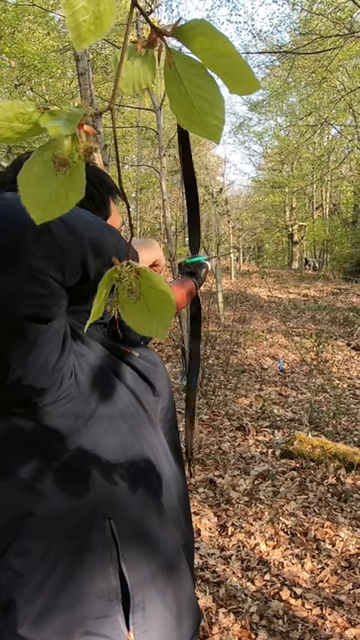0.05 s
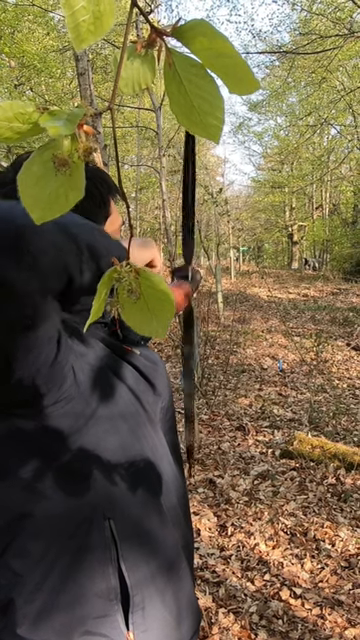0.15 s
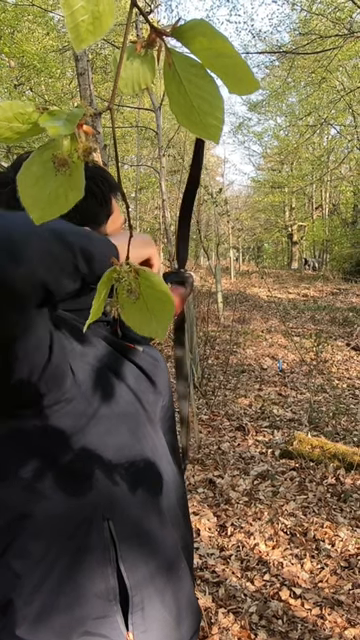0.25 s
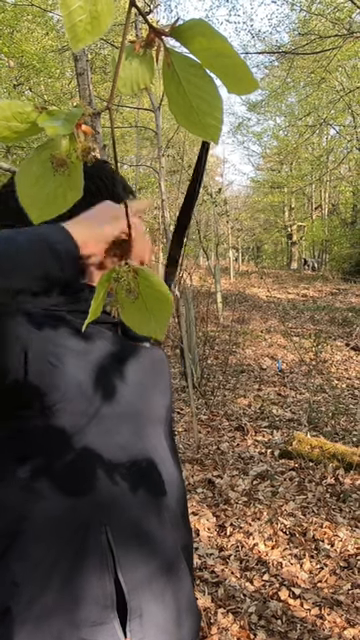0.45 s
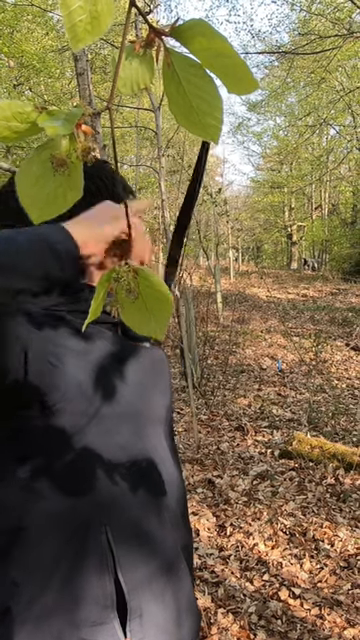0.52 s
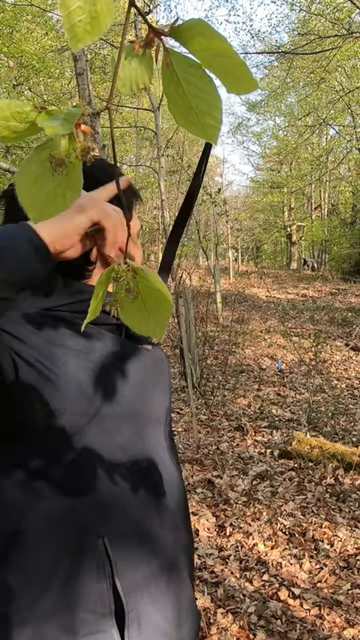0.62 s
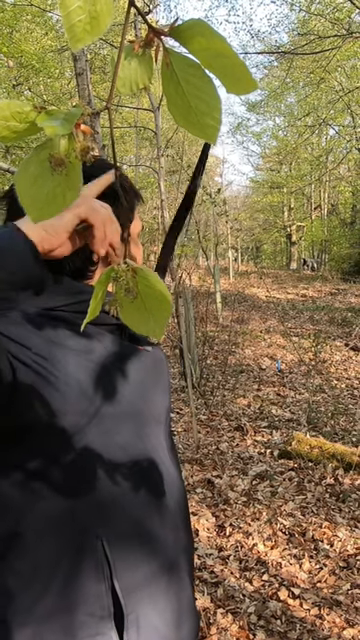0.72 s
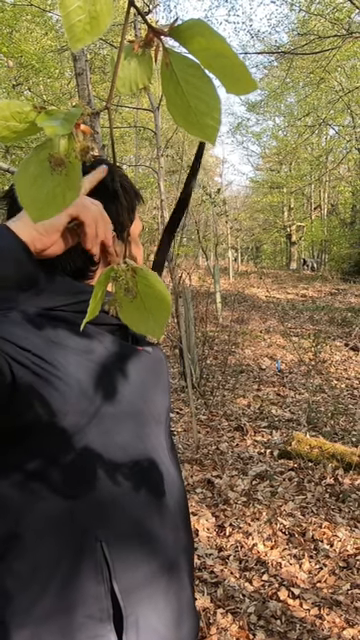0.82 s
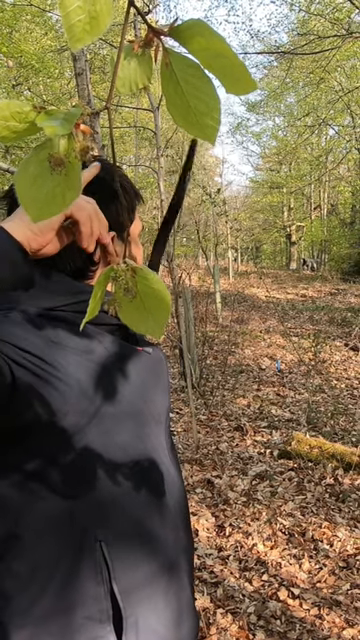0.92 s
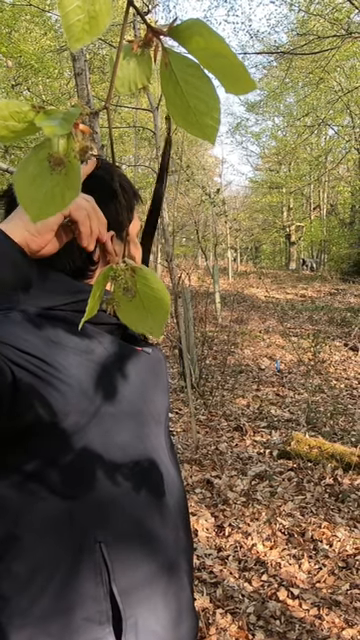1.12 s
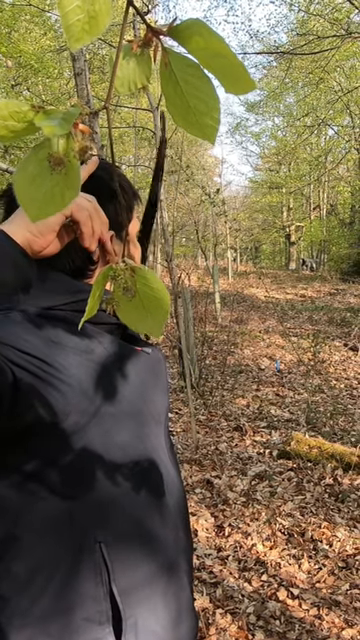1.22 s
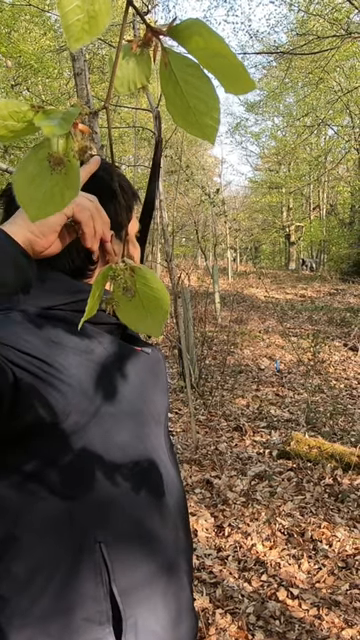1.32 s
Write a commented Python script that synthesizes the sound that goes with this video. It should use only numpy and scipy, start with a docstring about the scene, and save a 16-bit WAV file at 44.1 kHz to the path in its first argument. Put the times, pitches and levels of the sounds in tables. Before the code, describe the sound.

A bow fires an arrow with a dull thump and clack, echoing through quiet woods.

```python
"""A bow is shot in a quiet wood, heard from just behind the archer; the whole sound is deep and dull.
First the string scrapes off the fingers and the bow's limbs (its bendy arms) lurch forward.
The arrow clacks along the bow, the string slaps home, and limbs and string swing on.
Then tree trunks scatter the shot into a long tail, in which one faint far knock is heard.
A thin hiss rides on the shot, and moving air rumbles softly from start to end."""
import sys
import numpy as np
from scipy import signal
from scipy.fft import rfft, irfft
from scipy.io import wavfile
from scipy.ndimage import uniform_filter1d

SR = 44100
rng = np.random.default_rng(int(sys.argv[2]) if len(sys.argv) > 2 else 0)


def bounce(signal):
    """Save signal as a 16-bit WAV file at the path given by the first command-line argument."""
    frames = np.transpose(np.atleast_2d(signal))
    limited = np.clip(frames, -1, 1)
    pcm = np.round(limited * 32767).astype(np.int16)
    wavfile.write(sys.argv[1], SR, pcm)


N = 59535

# Hits on the bow: start_s, thump_db, knock_db, clack_db, contact_s
BOW_HITS = [(0.2007, -38, -34, -31, 0.0009), (0.208, -21, -22, -30, 0.004), (0.2222, -9, -17, -34, 0.003),
            (0.2298, -12, -15, -27, 0.003), (0.2598, -21, -22, -39, 0.0013), (0.2748, -18, -13, -17, 0.002),
            (0.2775, -20, -18, -13, 0.0005), (0.2835, -22, -14, -28, 0.002), (0.2921, -15, -8, -9, 0.0025),
            (0.3009, -32, -2, -24, 0.002), (0.307, -16, -12, -16, 0.002), (0.3098, -15, -34, -20, 0.0005),
            (0.326, -23, -18, -29, 0.0005), (0.3439, -20, -22, -25, 0.0015),
            (0.3584, -20, -12, -30, 0.0038)]
# The grip's low (thump), middle (knock) and high (clack) tones; the middle tones together make one broad, short
# ring near 850 Hz: pitch_hz, level_db, ring_s
THUMP_TONES = [(188, -1, .06), (210, -5, .07), (265, -10, .05), (350, -3, .04), (435, -6, .045)]
KNOCK_TONES = [(685, -8, .04), (805, -4, .035), (935, -3, .035), (1010, -12, .025)]
CLACK_TONES = [(1340, -8, .03), (1440, -5, .03), (1530, -5, .035), (2000, -18, .035)]


def bow_hits():
    """Each hit from the arrow or string makes the bow's grip ring and gives a short, noisy crack."""
    trim_db, crack_db, crack_fade_s = -0.5, -15.5, 0.012
    ringing, cracks = np.zeros((2, N)), np.zeros(N)
    for start_s, thump_db, knock_db, clack_db, contact_s in BOW_HITS:
        groups = ((THUMP_TONES, thump_db, -0.84, 0.00002),
                  (KNOCK_TONES, knock_db, -0.7, 0.00001),
                  (CLACK_TONES, clack_db, -11, -0.00013))
        for tones, level_db, left_minus_right_db, right_delay_s in groups:
            for ear, side in enumerate((1, -1)):  # left, then right
                gain = gain_of(level_db + trim_db + side * left_minus_right_db / 2)
                ringing[ear] += gain * ring(tones, start_s - side * right_delay_s / 2, contact_s)
        t = since(start_s)
        cracks += gain_of(clack_db) * (1 - np.exp(-t / contact_s)) * np.exp(-t / crack_fade_s)
    return ringing + gain_of(crack_db) * cracks * stereo_noise()


# The limbs' lurch, the swing of limbs and string, the bow's faint ring: pitch_hz, level_db, ring_s
LURCH_TONES = [(52, -21, .2)]
SWING_TONES = [(26.5, -14, 0.64), (54.8, -19.5, .3), (187, -38.5, 0.95)]
AFTER_RING_TONES = [(722, -41.5, 2.7), (950, -46, 1.8), (262.7, -35.5, 0.62)]


def limbs_and_string():
    """The limbs lurch when let go and flap when the string snaps straight; bow and string ring on."""
    release_s, straight_s, push_s = 0.208, 0.303, 0.0082
    lurch = ring(LURCH_TONES, release_s, push_s)
    swing = ring(SWING_TONES + AFTER_RING_TONES, straight_s, push_s)
    hum_hz, hum_db, hum_ring_s = 84, -27, 1.4
    string_hum = ring([(hum_hz, hum_db, hum_ring_s)], straight_s, rise_s=0.09)
    return lurch + swing + string_hum


# Tone colour of the string sliding off the fingers: pitch_hz, level_db
SCRAPE_COLOUR = [(60, -14), (110, -8), (200, 1), (370, 0), (460, -12), (560, -21), (640, -5), (850, -3),
                 (1020, -13), (1170, -27), (1480, -11), (1750, -27), (2000, -14), (2400, -23), (3200, -24)]


def string_scrape():
    """The string rubs unevenly over the fingers, and the arrow over its rest."""
    start_s, rise_s, end_s, fade_s = 0.18, 0.04, 0.312, 0.035
    level = np.minimum(since(start_s) / rise_s, 1) ** 2 * np.exp(-since(end_s) / fade_s)
    rubbing = flicker(depth=0.3, samples=90)
    return gain_of(-28.5) * level * normalise(colour(stereo_noise() * rubbing, SCRAPE_COLOUR))


# Tone colour of the near echoes: pitch_hz, level_db
ECHO_COLOUR = [(60, -8), (150, -6), (300, 0), (430, 0), (550, -6), (850, -2), (1150, -4), (1450, -1),
               (1750, -4), (2100, 2), (3000, 0)]


def near_echoes(shot):
    """The shot bounces quickly off the ground and the nearest trunks."""
    fade = rise_and_fade(start_s=0, rise_s=0.02, ring_s=0.45)
    echoes = colour(stereo_noise() * normalise(fade) / np.sqrt(N), ECHO_COLOUR)
    return gain_of(-11) * signal.fftconvolve(shot * np.ones((2, 1)), echoes, axes=1)[:, :N]


# Tone colour of the long tail: pitch_hz, level_db
TAIL_COLOUR = [(60, 4.5), (120, -6.5), (250, -6.5), (400, -9), (550, -10), (700, -3.5), (900, -4.5),
               (1200, -10), (1450, -5.5), (1800, -16), (2050, -17), (2400, -28), (3200, -24.5)]


def far_echoes(shot):
    """The shot's energy comes back from many far trunks as a grainy, slowly fading wash."""
    fade = rise_and_fade(start_s=0, rise_s=0.041, ring_s=2.72) ** 2
    energy = np.abs(signal.fftconvolve(shot ** 2, fade / fade.sum())[:N])
    trunks = flicker(depth=0.12, samples=200)
    return gain_of(-9) * np.sqrt(energy) * normalise(colour(stereo_noise() * trunks, TAIL_COLOUR))


# A knock far away: start_s, level_db
FAR_KNOCK = [(0.9635, -39)]


def far_knock():
    """A faint, dull knock, probably the arrow landing; it borrows the grip's tones."""
    groups = ((KNOCK_TONES, 0), (CLACK_TONES, -11), (THUMP_TONES, -5))
    return sum(gain_of(level_db + share_db) * ring(tones, start_s, rise_s=0.00019)
               for start_s, level_db in FAR_KNOCK for tones, share_db in groups)


# Tone colour of the faint hiss: pitch_hz, level_db
HISS_COLOUR = [(3500, -57), (5200, -37), (6300, -15.5), (7400, -1.5), (8100, -11.5), (8700, -42),
               (9700, -6.5), (10500, -7.5), (11500, -28.5), (14000, -50)]


def hiss(sound):
    """A thin, high hiss grows and fades with the middle pitches of the sound."""
    middle = keep_band(sound, "bandpass", [900, 2500], order=2)
    follow_s = 0.0091
    power = uniform_filter1d(np.mean(middle ** 2, axis=0), int(follow_s * SR))
    return gain_of(-27) * np.sqrt(np.abs(power)) * normalise(colour(stereo_noise(), HISS_COLOUR))


# Tone colour of the wood's low murmur: pitch_hz, level_db
MURMUR_COLOUR = [(20, -4.5), (45, 1.5), (90, -3.5), (170, 2), (280, -4.5), (500, -20), (700, -15.5),
                 (920, -10.5), (1170, -26), (1480, -10.5), (1800, -35.5), (2050, -27.5), (3200, -28.5)]
# How loud the murmur and the rumble are as time passes: time_s, level_db
MURMUR_LEVELS = [(0, -51.5), (0.059, -47), (0.16, -44.5), (0.851, -45.5), (1.1, -52), (1.2, -47.5),
                 (1.35, -50)]
RUMBLE_LEVELS = [(0, -52), (0.85, -52), (1.1, -60), (1.2, -52), (1.35, -56)]


def woodland_air():
    """The wood murmurs quietly over a deep rumble of moving air."""
    rumble = normalise(keep_band(rng.standard_normal(N), "lowpass", edge_hz=23, order=3))
    murmur = normalise(colour(stereo_noise(), MURMUR_COLOUR))
    return gain_curve(MURMUR_LEVELS) * murmur + gain_curve(RUMBLE_LEVELS) * rumble


# How strong the left-right difference is next to what both ears share: pitch_hz, level_db
STEREO_WIDTH = [(50, -15), (150, -7), (400, -8), (750, -10.5), (1150, -2), (1700, 0.5), (3000, -2.5),
                (10000, -1.5)]


def stereo_noise():
    """Noise for two ears, alike in the low pitches and unrelated in the high ones."""
    shared, difference = rng.standard_normal((2, N))
    ears = shared + colour(difference, STEREO_WIDTH) * np.array([[1], [-1]])
    even_out = [(hz, -10 * np.log10(1 + gain_of(db) ** 2)) for hz, db in STEREO_WIDTH]
    return colour(ears, even_out)


def ring(tones, start_s, rise_s):
    """Fading tones set going by a push that lasts about rise_s."""
    t = since(start_s)
    return sum(gain_of(db) * np.sin(2 * np.pi * hz * t) * rise_and_fade(start_s, rise_s, ring_s)
               for hz, db, ring_s in tones)


def rise_and_fade(start_s, rise_s, ring_s):
    """A level that swells, then drops by 60 dB every ring_s."""
    t = since(start_s)
    return (1 - np.exp(-t / rise_s)) * np.exp(-np.log(1000) * t / ring_s)


def flicker(depth, samples):
    """A level that wobbles at random around 1; more samples make it slower."""
    return np.exp(depth * normalise(uniform_filter1d(rng.standard_normal(N), size=samples)))


def colour(x, points):
    """Turn each pitch up or down along a curve of (pitch_hz, level_db) points."""
    hz, db = np.array(points, float).T
    pitches = np.maximum(np.fft.rfftfreq(2 * N, 1 / SR), 1)
    gains = gain_of(np.interp(np.log(pitches), np.log(hz), db))
    return irfft(rfft(x, 2 * N) * gains)[..., :N]


def keep_band(x, kind, edge_hz, order):
    """Keep the low, middle or high pitches; a higher order cuts more steeply."""
    return signal.sosfilt(signal.butter(order, edge_hz, kind, fs=SR, output="sos"), x)


def gain_of(db):
    """Turn decibels into a number to multiply by."""
    return 10 ** (np.asarray(db) / 20)


def gain_curve(points):
    """A gain that glides through (time_s, level_db) points."""
    return gain_of(np.interp(since(0), *np.array(points).T))


def normalise(x):
    """Scale to an average power of 1."""
    return x / np.sqrt(np.mean(x ** 2))


def since(start_s):
    """Seconds since a moment, zero before it."""
    return np.maximum(np.arange(N) / SR - start_s, 0)


def scene():
    """The shot, its echoes and the air are dulled together, then the hiss goes on top."""
    shot = bow_hits() + string_scrape() + far_knock()
    mono = shot.mean(axis=0)
    sound = shot + near_echoes(mono) + far_echoes(mono) + limbs_and_string() + woodland_air()
    dull = keep_band(sound, "lowpass", edge_hz=2216, order=8)
    return dull + hiss(dull)


def record(dry):
    """The microphone loses the deepest rumble and the very highest pitches."""
    dry = keep_band(dry, "highpass", edge_hz=14, order=2)
    top_hz = 15800
    return signal.sosfilt(signal.ellip(8, 0.2, 70, top_hz, fs=SR, output="sos"), dry)


dry = scene()
out = record(dry)
bounce(out)
```